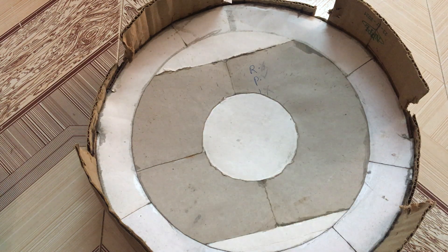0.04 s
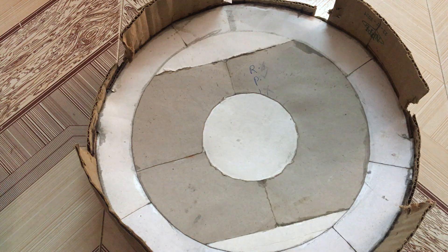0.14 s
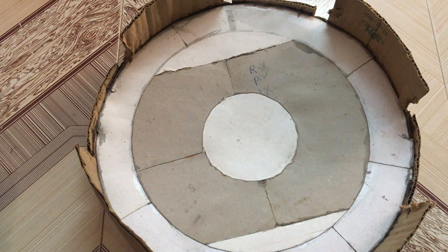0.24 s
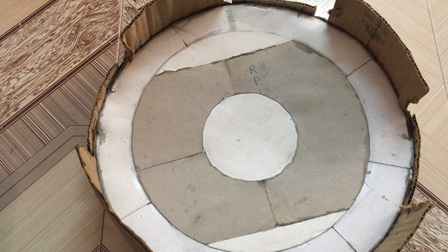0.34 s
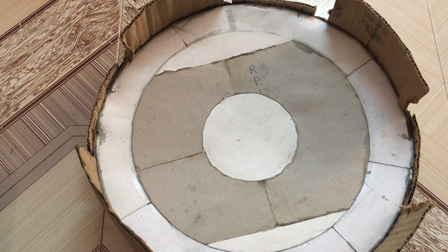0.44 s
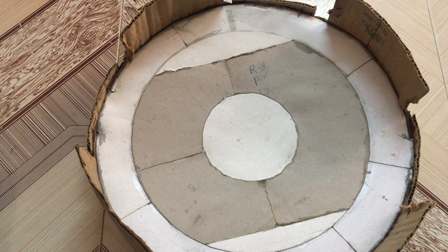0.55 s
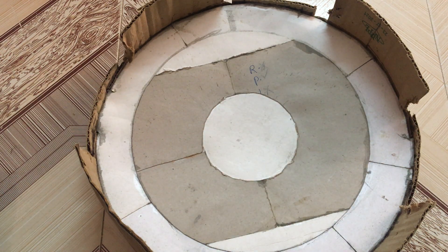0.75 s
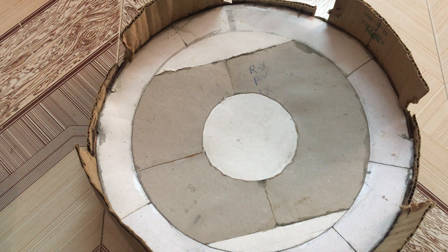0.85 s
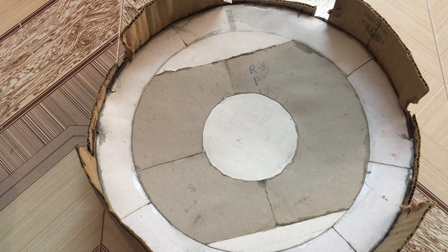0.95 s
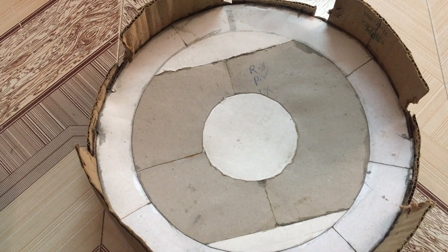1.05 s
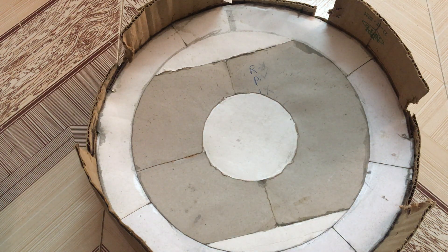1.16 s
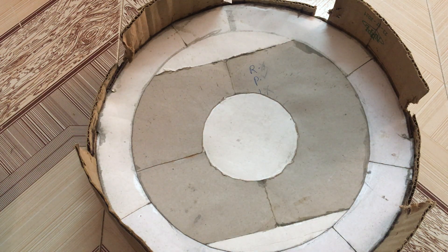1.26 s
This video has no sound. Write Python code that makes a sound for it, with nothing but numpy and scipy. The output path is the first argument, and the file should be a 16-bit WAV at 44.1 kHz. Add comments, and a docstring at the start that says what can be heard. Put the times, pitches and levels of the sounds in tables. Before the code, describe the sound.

A plastic toy launcher clacks as its plunger slides out with a falling hollow rub. It fires with a loud snap and a faint low ring, then rubs back, rising in pitch, in a bare, echoing room.

```python
"""A plastic toy launcher is cocked and fired in a bare, echoing room.
Its catch clacks and its shell rings at each stop. The plunger rubs out and back in a tube,
so the hollow note of the air inside falls and rises. The plastic scuffs lightly before a catch
lets go, and the shot leaves a low note ringing. Faint room noise and hum lie underneath;
one microphone hears it all."""
import sys
import numpy as np
from scipy import signal
from scipy.fft import rfft, irfft
from scipy.io import wavfile
from scipy.ndimage import uniform_filter1d

SR = 44100
rng = np.random.default_rng(int(sys.argv[2]) if len(sys.argv) > 2 else 0)


def wrap_up_sound(samples):
    """Save the sound to the file named by the first command line argument, as 16-bit audio."""
    columns = np.atleast_2d(samples).T
    # keep every value between -1 and 1, then stretch to whole-number steps
    tamed = np.clip(columns, -1, 1)
    steps = np.round(tamed * 32767).astype(np.int16)
    wavfile.write(sys.argv[1], SR, steps)


N = 57330  # samples: 1.3 s


def amp(db):
    """Turns decibels into a number to multiply by."""
    return 10 ** (np.asarray(db) / 20)


def unit_rms(x):
    """Scales a sound to an average power of one."""
    return x / np.sqrt(np.mean(x ** 2) + 1e-20)


def unit_energy(x):
    """Scales a sound to a total energy of one."""
    return x / np.sqrt(np.sum(x ** 2) + 1e-20)


def fade(t, fade_s):
    """Dies away by 60 dB in fade_s seconds."""
    return np.exp(-np.log(1000) * t / fade_s)


def look_up(table, hz):
    """Reads between a table's rows, with octaves evenly spaced."""
    row_hz, value = np.transpose(table)
    return np.interp(np.log(hz + 1), np.log(row_hz + 1), value)


def add(mix, start_s, sound):
    """Lays a sound into the mix."""
    part = mix[round(start_s * SR):][:len(sound)]
    part += sound[:len(part)]


def colour(x, *tables, size=2048):
    """Shapes a sound's tone with tables of f/Hz, gain/dB."""
    hz = abs(np.fft.fftfreq(size, 1 / SR))
    log_gain = np.log(amp(sum(look_up(table, hz) for table in tables)))
    taps = np.fft.ifft(np.exp(np.conj(signal.hilbert(log_gain)))).real  # never rings ahead of the sound
    return signal.fftconvolve(x, taps)[:len(x)]


# Tone of the room noise: f/Hz, relative level/dB
NOISE_COLOUR = [(15, -28), (25, -23), (70, -2), (212, -2), (285, -8), (439, -7.5), (714, -14), (1040, -16),
                (1190, -13.5), (1740, -24), (1890, -17), (2050, -22.5), (10400, -38), (11300, -39),
                (16000, -42)]
# Steady notes of the hum: f/Hz, level/dB
HUM_NOTES = [(64.6, -65), (431, -70), (1066, -70.5)]

def background(noise_db=-55.5):
    """Soft, low room noise with a faint hum."""
    t = np.arange(N) / SR
    gain = amp(look_up(NOISE_COLOUR, np.fft.rfftfreq(N, 1 / SR)))
    noise = irfft(rfft(rng.standard_normal(N)) * gain, N)
    hum = sum(amp(db) * unit_rms(np.sin(2 * np.pi * (hz * t + rng.random()))) for hz, db in HUM_NOTES)
    return amp(noise_db) * unit_rms(noise) + hum


# How long the room's echo takes to fade by 60 dB: f/Hz, fade time/s
ECHO_FADES = [(150, 1), (700, 0.97), (1500, 0.76), (3000, 0.64), (6000, 0.64), (10000, 0.56), (15500, 0.46)]

def room(x, direct_db=-8, early_db=-5.5, tail_db=-5):
    """The direct sound, quick echoes from nearby surfaces and a long tail, new for each sound."""
    t = np.arange(SR) / SR
    hz, frame_s, spectrum = signal.stft(rng.standard_normal(SR), SR, nperseg=256)
    fading = amp(-60 * frame_s / look_up(ECHO_FADES, hz)[:, None])
    tail = signal.istft(spectrum * fading, SR, nperseg=256)[1][:SR]
    early = rng.standard_normal(SR) * fade(t, fade_s=0.15)
    echoes = amp(early_db) * unit_energy(early) + amp(tail_db) * unit_energy(tail)
    response = np.zeros(SR)
    response[0] = amp(direct_db)
    add(response, start_s=0.0015, sound=echoes)
    return signal.fftconvolve(x, response)


# Light rubs of the plastic: t/s, length/s, level before the room/dB
SCUFFS = [(0.087, 0.058, -55), (0.408, .088, -46.5)]
# Tone of those rubs: f/Hz, relative level/dB
SCUFF_COLOUR = [(200, -19), (1500, 4), (3000, 1), (6000, -6), (10000, -11), (15500, -16)]

def scuff(length_s, level_db, rise_s=0.02):
    """Plastic rubs with a faint, bright hiss before a catch lets go."""
    t = np.arange(0, length_s, 1 / SR)
    hiss = unit_rms(colour(rng.standard_normal(N), SCUFF_COLOUR))[:len(t)]
    return amp(level_db) * np.minimum(t / rise_s, 1) * hiss


def thump(hz=183.1, level_db=-44.5):
    """The shot sets one low note ringing."""
    t = np.arange(SR) / SR
    return amp(level_db) * np.sin(2 * np.pi * hz * t) * fade(t, fade_s=1)


def resonate(x, hz, width_hz):
    """Filters a sound twice, keeping what lies near the gliding pitch hz."""
    turn = np.exp(2j * np.pi * np.cumsum(hz) / SR)
    feedback = np.exp(-np.pi * width_hz / SR)
    for _ in range(2):
        x = 2 * (turn * signal.lfilter([1 - feedback], [1, -feedback], x / turn)).real
    return x


# Tone of the plastic shell, rubbed or struck: f/Hz, relative level/dB
SHELL_COLOUR = [(60, -25), (180, -7), (330, -15.5), (520, -19), (900, -11.5), (1350, -5), (2100, 1),
                (3100, 2.5), (4500, -8.5), (6300, -14), (9000, -25), (15500, -36)]
# Notes of the air in the tube: multiple of the lowest note, half the filter width/Hz, relative level/dB
TUBE_NOTES = [(1.0, 206, 3), (1.85, 258, 1), (3.1, 430, -31)]
# Plunger strokes (out, back, settling), a list each: t/s, level before the room/dB, lowest note f/Hz
PLUNGER_STROKES = [
    [(.240, -23, 1610), (.275, -28, 1426), (.305, -32.5, 1100), (.345, -33.5, 823), (.385, -35, 865),
     (.43, -45.5, 896), (.49, -37, 1530)],
    [(.525, -35, 860), (.555, -33.5, 930), (.58, -27, 1180), (.61, -25.5, 1414), (.645, -38, 1656),
     (.668, -30, 1560)],
    [(.815, -35.5, 1290), (.855, -47, 1389), (.90, -69, 1470), (.935, -49, 1540), (.96, -62, 1510)],
]

def plunger(stroke, grain_s=0.0047, grain_db=0.5, scrape_db=-11):
    """Grainy rubbing sounds the shell and the tube's air; the longer the air column, the lower its note."""
    times, levels_db, notes_hz = np.transpose(stroke)
    t = np.arange(N) / SR
    grain = unit_rms(uniform_filter1d(rng.standard_normal(N), int(grain_s * SR)))
    rub = rng.standard_normal(N) * amp(grain_db * grain)
    note_hz = np.interp(t, times, notes_hz)
    air = sum(amp(db) * unit_rms(resonate(rub, multiple * note_hz, 2 * half_width))
              for multiple, half_width, db in TUBE_NOTES)
    scrape = amp(scrape_db) * unit_rms(colour(rub, SHELL_COLOUR))
    level = amp(np.interp(t, times, levels_db)) * (t > times[0]) * (t < times[-1])
    return level * (unit_rms(air) + scrape)


# Knocks on the plastic: t/s, base level/dB, treble boost/dB, bass boost/dB, contact fade/s,
# ring relative to the base level/dB, low ring f/Hz, high ring f/Hz
KNOCKS = [ (0.1276, -23.5, 0.5, -1, 0.009, -10, 1417, 2836), (0.1734, -29.5, 9, 4, 0.0021, -9, 1550, 2940),
          (0.2022, -32.5, 22.5, 0, 0.0041, -5.5, 1550, 2933),
          (0.2378, -22, -19, -11, 0.0017, -11, 1494, 3020), (0.278, -29.5, -26, 8, 0.0062, -15, 1474, 2950),
          (0.497, -24, 14, 0, 0.0047, -5, 1402, 3077), (0.5025, -11, 8, -4.5, 0.0034, -6, 1325, 2883),
          (0.5091, -22, -2.5, -14, 0.0022, -13.5, 1365, 3097),
          (0.5380, -19, 6.5, -10.5, 0.00036, -5, 1590, 2825),
          (0.608, -16.5, 6.5, -24, 0.0022, -26, 1570, 2910),
          (0.6360, -21.5, 4, 2.5, 0.0022, 4.5, 1559, 2727),
          (0.6512, -25.5, 7.5, -3.5, 0.0021, -0.5, 1610, 2945),
          (0.7765, -19, 2, -6, 0.0014, -13, 1450, 3090), (0.807, -35.5, 15, 1, 0.00044, -28, 1500, 2996),
          (0.9800, -55.5, 21, 5, 0.0041, -13, 1500, 2880), (1.248, -60, 19, 22, 0.0018, -14, 1120, 2870)]

def clack(level_db, treble_db, bass_db, contact_s, ring_db, low_hz, high_hz):
    """Plastic parts chatter briefly as they meet, and two hollow notes of the shell ring on."""
    t = np.arange(SR // 8) / SR
    contact = np.exp(-t / contact_s)
    chatter = rng.standard_normal(len(t)) * contact
    crack = unit_energy(colour(chatter, SHELL_COLOUR))
    crack = colour(crack, [(3030, 0), (9350, treble_db)], [(560, bass_db), (1290, 0)])
    swell = 1 - contact  # the ring builds as the chatter dies
    low = unit_energy(np.sin(2 * np.pi * low_hz * t) * swell * fade(t, fade_s=0.056))
    high = unit_energy(np.sin(2 * np.pi * high_hz * t) * swell * fade(t, fade_s=0.061))
    ring = amp(ring_db) * unit_energy(low + amp(4) * high)
    strength = amp(level_db) * np.sqrt(0.01 * SR)  # as much energy as 10 ms at the base level
    return strength * (crack + ring)


def scene():
    """All sounds of the toy in the room, the same in both channels."""
    mix = background()
    add(mix, start_s=0.503, sound=thump())
    for stroke in PLUNGER_STROKES:
        add(mix, 0, room(plunger(stroke)))
    for start_s, *knock in KNOCKS:
        add(mix, start_s, room(clack(*knock)))
    for start_s, length_s, level_db in SCUFFS:
        add(mix, start_s, room(scuff(length_s, level_db)))
    return np.array([mix, mix])


def record(dry, low_cut_hz=38, high_cut_hz=16000):
    """The microphone loses the deepest bass; then the highest treble is cut off."""
    bass_cut = signal.butter(4, low_cut_hz, "high", fs=SR, output="sos")
    treble_cut = signal.firwin(511, high_cut_hz, window=("kaiser", 9), fs=SR)
    return signal.oaconvolve(signal.sosfilt(bass_cut, dry), treble_cut[None], "same")


dry = scene()
out = record(dry)
wrap_up_sound(out)
```